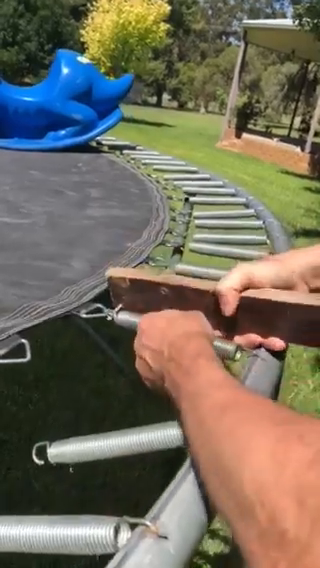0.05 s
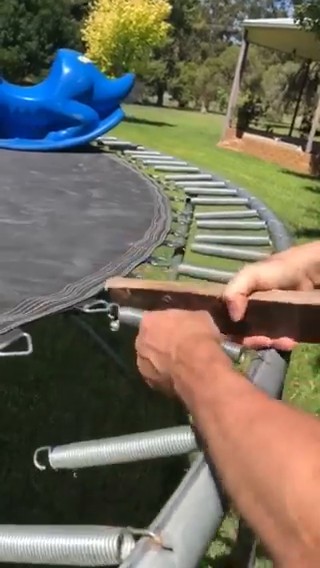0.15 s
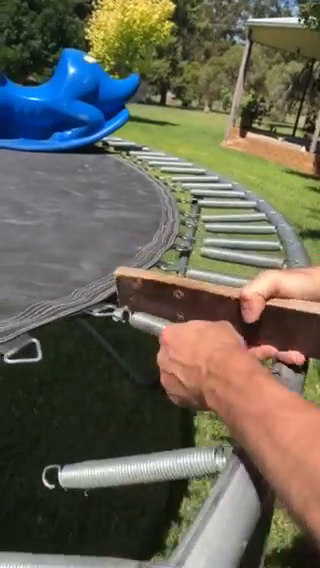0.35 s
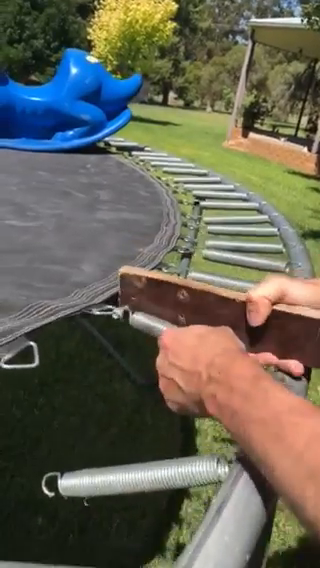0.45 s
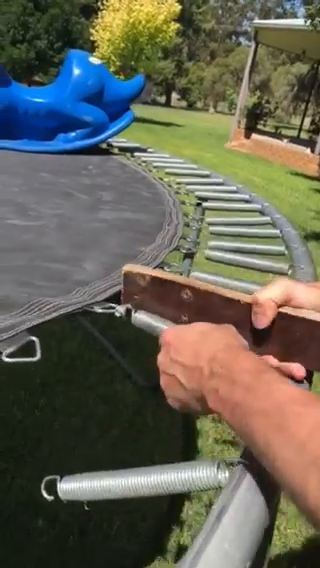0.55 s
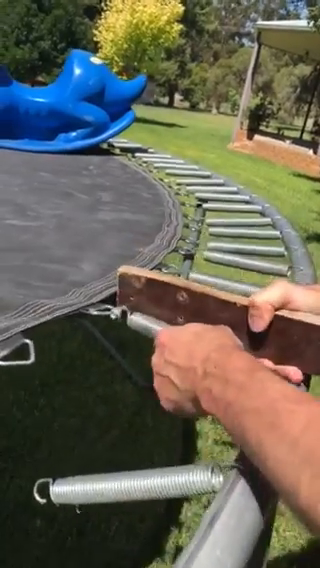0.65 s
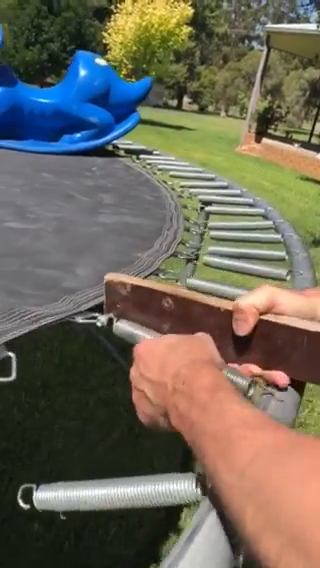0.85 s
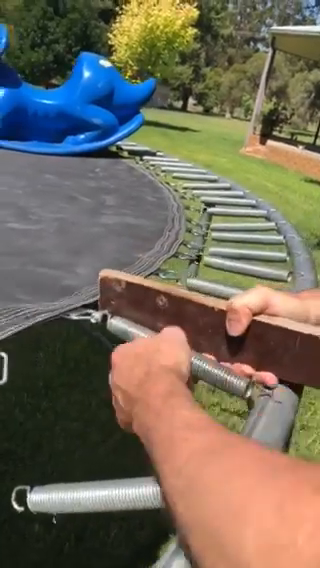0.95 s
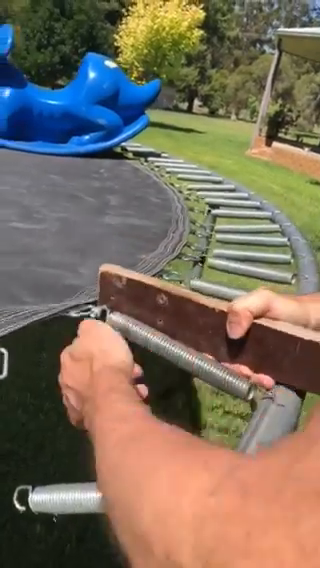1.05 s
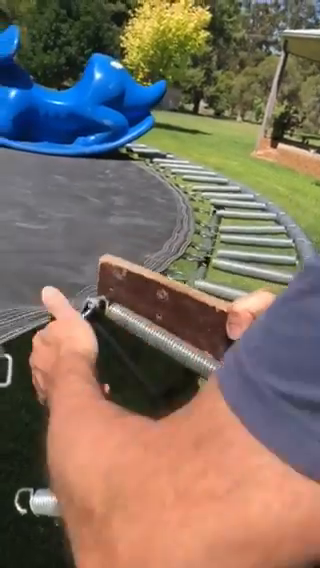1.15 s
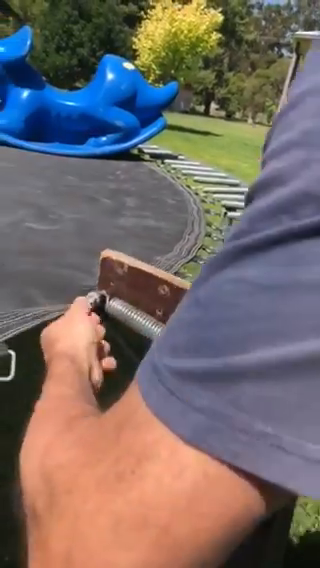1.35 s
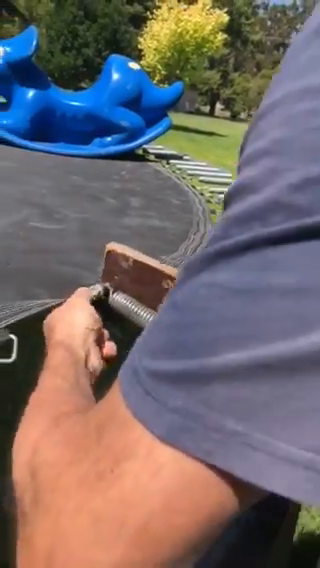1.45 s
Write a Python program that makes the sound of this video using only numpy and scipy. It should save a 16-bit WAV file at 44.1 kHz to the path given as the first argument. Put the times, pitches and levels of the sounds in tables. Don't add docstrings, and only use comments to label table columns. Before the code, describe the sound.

Sharp metal clinks from a trampoline spring, then a rattling, scraping release in a quiet garden

```python
import sys
import numpy as np
from scipy import signal
from scipy.fft import rfft, irfft
from scipy.io import wavfile
from scipy.ndimage import uniform_filter1d

SR = 44100
rng = np.random.default_rng(int(sys.argv[2]) if len(sys.argv) > 2 else 0)


def wav_out(sig):
    wavfile.write(sys.argv[1], SR, np.round(np.clip(np.atleast_2d(sig).T, -1, 1) * 32767).astype(np.int16))


def ratio(d):
    e = np.asarray(d, float) / 20
    return 10 ** e


N = 66150
TIME_S = np.arange(N) / SR


def unit(x):
    return x / np.sqrt(np.mean(x ** 2))


def curve(rows, column=1):
    rows = np.array(rows)
    return np.interp(TIME_S, rows[:, 0], rows[:, column])


def noise(colour):
    hz, db = np.array(colour).T
    f = np.maximum(np.fft.rfftfreq(N, 1 / SR), 1)
    gain = ratio(np.interp(np.log(f), np.log(hz), db))
    return unit(irfft(rfft(rng.standard_normal(N)) * gain, N))


def band(x, hz, width_hz):
    return signal.lfilter(*signal.iirpeak(min(hz, 0.45 * SR), hz / width_hz, fs=SR), x)


def highpass(x, hz):
    return signal.sosfilt(signal.butter(2, hz, "high", fs=SR, output="sos"), x)


def walk(rate_hz):
    k = int(SR / rate_hz)
    steps = np.repeat(rng.standard_normal(N // k + 1), k)
    return unit(uniform_filter1d(uniform_filter1d(steps, k), k)[:N])


def add(out, at_s, x):
    i = int(at_s * SR)
    out[i:i + len(x)] += x[:N - i]


def garden():
    # (frequency [Hz], level per Hz [dB])
    floor_colour = [(25, -53), (60, 4.5), (180, -4), (600, -9), (1500, -9), (4000, -19.5), (8000, -20),
                    (15700, -16.5)]
    floor = noise(floor_colour) * ratio(-63.5 + 0.26 * walk(7.4))
    drone = unit(band(rng.standard_normal(N), 173.5, 1.2)) * ratio(-72.5)
    return floor + drone * np.clip((1.2 - TIME_S) / 0.05, 0, 1)


def leaves():
    # (time [s], level [dB])
    breeze = [(0, -67), (.12, -58), (.2, -62), (.7, -68), (.9, -99.5), (1.5, -67.5)]
    return unit(band(rng.standard_normal(N), 7500, 16700)) * ratio(curve(breeze))


def wind():
    # (time [s], level [dB])
    gusts = [(0.0, -65), (0.032, -68), (0.146, -85), (0.166, -66), (0.38, -57.5), (0.426, -63.5),
             (0.642, -62), (0.66, -63), (0.714, -51.5), (0.752, -70), (0.814, -85), (0.848, -57.5),
             (0.952, -76), (1.16, -78), (1.22, -66), (1.252, -61.5), (1.49, -70), (1.5, -80)]
    hz = 76
    buffet = unit(band(band(rng.standard_normal(N), hz, 111), hz, 130))
    return highpass(buffet * ratio(curve(gusts) - 1 + 3.4 * walk(20)), 35)


def birds():
    # (time [s], pitch [Hz], level [dB])
    far_notes = [
        [(.02, 3500, -63), (.05, 4300, -62)],
        [(.695, 3400, -55.5), (.72, 3900, -65)],
        [(1.47, 2500, -70), (1.5, 3800, -65)],
        [(.09, 4400, -62), (.14, 4450, -65)],
        [(.865, 4250, -69), (.935, 3880, -68)],
        [(1.035, 4960, -65), (1.052, 4590, -63.5), (1.118, 4430, -64.5)],
        [(1.135, 4150, -55), (1.175, 4050, -60)],
    ]
    # (time [s], pitch [Hz], level [dB])
    near_whistle = [(1.335, 2290, -70), (1.372, 2330, -61), (1.383, 2520, -57), (1.39, 3000, -59),
                    (1.396, 3550, -53), (1.403, 4200, -59), (1.414, 4850, -61), (1.423, 5300, -63)]
    out = np.zeros(N)
    for note in far_notes + [near_whistle]:
        start_s, end_s = note[0][0], note[-1][0]
        edge = np.clip(np.minimum(TIME_S - start_s, end_s - TIME_S) / 0.0036, 0, 1)
        phase = np.cumsum(curve(note) * (1 + 0.011 * walk(200))) / SR
        level_db = curve(note, 2) + 1 + 2.5 * walk(250)
        out += edge * ratio(level_db) * np.sin(2 * np.pi * phase)
    echo_s, echo_db = 0.012, -10
    return out + ratio(echo_db) * np.roll(out, int(echo_s * SR))


def rustle():
    # (time [s], level [dB])
    rubbing = [(0, -61), (.12, -63.5), (.5, -64), (.6, -61), (.71, -56), (.83, -58.5), (.93, -63),
               (1.1, -68), (1.4, -59.5), (1.45, -56), (1.5, -68.5)]
    # (frequency [Hz], level per Hz [dB])
    rub_colour = [(150, -8.5), (900, -6), (2000, -11), (4500, -13), (6500, -19), (16000, -41)]
    return noise(rub_colour) * ratio(curve(rubbing) + 1.24 * walk(190))


def thuds():
    # (time [s], peak [dB], frequency [Hz], length [cycles])
    dull_knocks = [(.2237, -44, 720, 3.6), (0.35, -41.5, 300, 2.55), (0.23, -42, 174, 0.89),
                   (0.3541, -32, 850, 4.5), (.3585, -37, 817, 2.2), (.519, -51, 900, 1.8),
                   (1.23, -42.5, 244, 1.9), (1.294, -42.5, 840, 1.5), (0.69, -49.5, 76, 1.7),
                   (0.97, -64, 360, 1.1), (1.189, -35.5, 760, 2.4), (1.217, -36, 425, 2.7),
                   (1.205, -44.5, 125, 1.47)]
    out, t = np.zeros(N), np.arange(SR // 10) / SR
    for at_s, db, hz, cycles in dull_knocks:
        u = t * hz / cycles
        add(out, at_s, ratio(db) * np.sin(2 * np.pi * hz * t) * 8 * u * np.exp(-3 * u))
    return out


def ticks():
    # (time [s], peak [dB], centre [Hz])
    touches = [(.858, -59, 13500), (0.918, -54, 10900), (.944, -59, 10200), (0.994, -49.5, 14500),
               (1.1, -51, 9000), (0.966, -44.5, 6000), (0.974, -46, 12920), (1.01, -55, 12000),
               (1.053, -46.5, 12300), (1.061, -47, 8000), (1.171, -42, 11000), (1.387, -44, 6260),
               (1.428, -40.5, 5330), (1.451, -38.5, 4550), (1.474, -55, 7000), (1.49, -60, 11300)]
    out, t = np.zeros(N), np.arange(SR // 10) / SR
    for at_s, db, hz in touches:
        tick = band(rng.standard_normal(len(t)) * np.exp(-t / 0.0018), hz, 0.54 * hz)
        add(out, at_s, ratio(db) * tick / np.abs(tick).max())
    return out


def drag():
    # (time [s], level [dB])
    dragging = [(1.17, -82), (1.21, -49), (1.27, -55), (1.33, -54.5), (1.4, -58.5), (1.45, -62.5),
                (1.5, -61)]
    # (frequency [Hz], width [Hz], level [dB])
    resonances = [(769, 99, -3.7), (1077, 80, -2), (1477, 91, 0.33), (1736, 110, 1)]
    grit = rng.standard_normal(N) * ratio(1.5 * walk(500))
    body = sum(ratio(db) * band(band(grit, hz, w), hz, 2 * w) for hz, w, db in resonances)
    low = unit(band(band(grit, 570, 830), 570, 1100))
    return (unit(body) + 0.38 * low) * ratio(curve(dragging)) * (TIME_S > dragging[0][0])


def squeal():
    # (time [s], pitch [Hz], level [dB])
    slide = [(1.27, 1750, -70), (1.33, 1680, -78), (1.37, 1640, -51.5), (1.4, 1740, -56.5),
             (1.45, 1780, -56), (1.465, 1800, -64), (1.5, 1830, -59.5)]
    phase = np.cumsum(curve(slide) * (1 + 0.018 * walk(150))) / SR
    level_db = curve(slide, 2) + 2.5 * walk(100)
    return np.sin(2 * np.pi * phase) * ratio(level_db) * (TIME_S > slide[0][0])


def singing():
    # (time [s], peak [dB], frequency [Hz], swell [s])
    tones = [(0.238, -43.5, 2877, 0.024), (.245, -51, 1760, 0.018), (.362, -49, 1870, .012),
             (.36, -52, 3400, .012), (0.365, -41.5, 2873, 0.017), (0.45, -57, 2876, 0.015),
             (1.206, -44.5, 2910, 0.013), (1.228, -61, 255, .06), (1.238, -43.5, 3020, 0.006),
             (1.25, -42, 2890, 0.013), (1.3, -61, 169, .09), (1.317, -58, 2880, 0.018)]
    out, t = np.zeros(N), np.arange(SR // 4) / SR
    for at_s, db, hz, swell_s in tones:
        rough = unit(band(rng.standard_normal(len(t)), hz, hz / 17))
        tone = np.sin(2 * np.pi * hz * t) + 0.33 * rough
        add(out, at_s, ratio(db) * tone * t / swell_s * np.exp(1 - t / swell_s))
    return out


def contacts(rows, modes, rattle, rattle_t60_s, tick_db, cycles, rise):
    out, t = np.zeros(N), np.arange(SR // 3) / SR
    hz, db, t60_s = np.repeat(np.array(modes), 8, axis=0).T[:, :, None]
    hz = hz * (1 + 0.019 * rng.standard_normal(hz.shape))
    fall = np.log(1000) * t
    low = signal.sosfilt(signal.butter(2, 3500, fs=SR, output="sos"), rattle)
    for at_s, peak_db, knock_hz, ring_db, rattle_db in rows:
        tick = band(rng.standard_normal(len(t)), 1.7 * knock_hz, 8800) * np.exp(-t / 0.0003)
        knock = np.sin(2 * np.pi * knock_hz * t) * np.exp(-t * knock_hz / cycles)
        knock *= 1 - np.exp(-t * knock_hz * rise)

        level_luck, phase_luck = rng.standard_normal((2, len(hz), 1))
        mode_gain = ratio(db - 1.5 * level_luck) / 3
        partials = mode_gain * np.sin(2 * np.pi * hz * t + 3 * phase_luck) * np.exp(-fall / t60_s)
        ring = partials.sum(0) * (1 - np.exp(-t / 0.00055))
        add(out, at_s, ratio(peak_db) * (knock + ratio(tick_db) * tick + ratio(ring_db) * ring))

        i = int(at_s * SR)
        fade = np.exp(-fall / rattle_t60_s)[:N - i]
        tail = rattle[i:i + len(t)] * fade
        tail += 0.14 * low[i:i + len(t)] * fade ** (1 / 5.14)
        add(out, at_s, ratio(peak_db + rattle_db) * tail)
    return out


def spring():
    # (time [s], peak [dB], knock [Hz], ring [dB], rattle [dB])
    first = [(.2085, -44.5, 6040, -20, -2), (.2125, -22.5, 2070, -31, -16), (.2146, -32, 9300, 9.5, -32),
             (.2239, -3.5, 1810, -32, -20), (.2238, -0.5, 3120, -29, -30), (.2238, -10.5, 4630, -32, -27),
             (.2262, -26, 6700, -9, -56), (.2295, -19.5, 1930, -3, -58), (.241, -32.5, 8400, 7.5, -22)]
    second = [(.3312, -35, 1820, -5.5, -2), (.3512, -17, 4190, -14, -12.5), (.3537, -8, 6570, -9, -39),
              (.3518, -24.5, 1800, -25, -38), (.3561, -19, 9050, -18, -34), (.3612, -35, 8340, 3, -23),
              (.3632, -35, 3240, 5, -33), (.3658, -33, 1930, -8, -26), (.372, -35, 8300, -10, -7)]
    third = [
        (.4472, -17, 5700, -14, -17),
        (.4497, -28.5, 9600, -8, -22),
        (.4528, -54, 5540, -8, -32),
    ]
    slip = [(1.1168, -40, 7600, -34, -11.5), (1.1205, -40.5, 2120, -19, -12),
            (1.126, -28, 5060, -19, -14.5), (1.131, -44, 4830, 9, -26), (1.148, -45.5, 3800, 4, -13),
            (1.176, -43.5, 1500, -31, -5)]
    release = [(1.1865, -23.5, 3330, -11, -20), (1.1885, -25.5, 1540, -35, -26),
               (1.1876, -26, 4500, -35, -27), (1.195, -25.5, 4150, -8, -35), (1.2005, -31, 6600, -26, -14),
               (1.2022, -21.5, 3440, -9.5, -16.5), (1.2024, -31, 4650, -13, -24),
               (1.2027, -19, 1660, -25, -20.5), (1.2245, -31.5, 1550, -6, -18),
               (1.2375, -32.5, 5970, -9, -10), (1.2415, -30, 5000, -11, -28),
               (1.2448, -40.5, 5850, -14, -6.5), (1.2485, -36.5, 5350, -2.5, -21),
               (1.253, -29.5, 3090, -8.5, -30), (1.256, -38, 5440, 4, -19), (1.2605, -52, 5030, -18, -20),
               (1.2645, -48, 5600, -10, -20), (1.269, -45, 4570, 4, -17), (1.316, -42, 8800, -14, -11.5)]
    # (frequency [Hz], level [dB], t60 [s])
    ring_first = [(6600, -14, 0.045), (8350, -11.5, 0.11), (9230, -13, .055), (15400, -29.5, 0.055)]
    ring_second = [(5860, -6, 0.027), (6770, -7.5, 0.042), (8410, -8, 0.12), (9230, 0.5, 0.026),
                   (15400, -10, 0.051)]
    ring_third = [(4860, -2, 0.025), (6100, -4, 0.04), (9000, -6, 0.035), (9700, -6, .035),
                  (10540, -5, 0.03)]
    ring_slip = [(3700, -8, 0.02), (5120, -8, 0.02), (8200, -10, 0.025), (10000, -10, 0.02)]
    ring_free = [(4830, -8, 0.07), (5120, -8, 0.07), (5980, -13, 0.035), (8410, -18, 0.06)]
    # (frequency [Hz], level per Hz [dB])
    tight_colour = [(250, -9), (900, -10.5), (1800, -8.5), (3000, -9.5), (5000, -3.5), (8500, -10),
                    (12000, -13), (15700, -9)]
    free_colour = [(300, -5.5), (900, -12), (1700, -4), (2300, -17.5), (3200, -5), (6000, -9), (10000, -17),
                   (16000, -22.5)]
    tight = noise(tight_colour) * ratio(2.5 * walk(500))
    free = noise(free_colour) * ratio(2.5 * walk(500))
    out = contacts(first, ring_first, tight, 0.049, -23, 1.75, 2.83)
    out += contacts(second, ring_second, tight, 0.079, 2.5, 4.7, 1.6)
    out += contacts(third, ring_third, tight, 0.03, -15, 2.8, 2.2)
    out += contacts(slip, ring_slip, free, 0.031, 3.5, 1.8, 2.8)
    out += contacts(release, ring_free, free, 0.056, -20, 5.1, 1.6)
    return highpass(out, 250)


def scene():
    background = garden() + leaves() + wind() + birds()
    handling = rustle() + thuds() + ticks() + drag() + squeal()
    return (background + handling + singing() + spring())[None]


def band_limit(x):
    return signal.sosfilt(signal.butter(12, 16980, fs=SR, output="sos"), x)


def record(dry):
    top_cut = signal.ellip(8, 0.5, 32, 15850, fs=SR, output="sos")
    return band_limit(signal.sosfilt(top_cut, dry))


dry = scene()
out = record(dry)
wav_out(out)
```